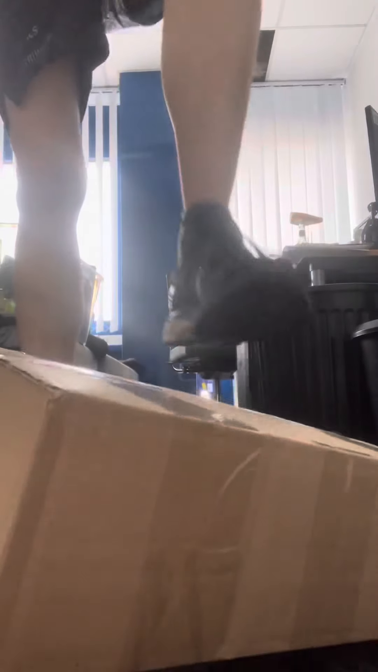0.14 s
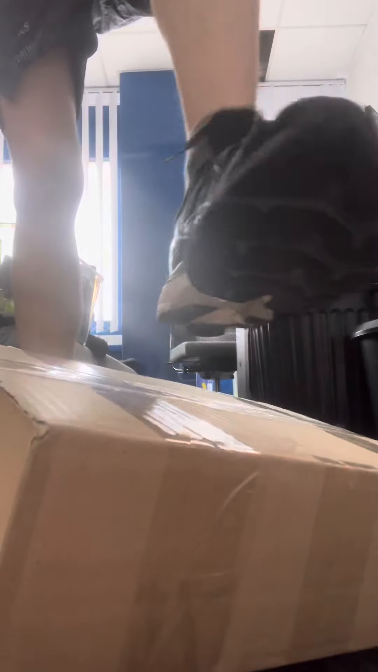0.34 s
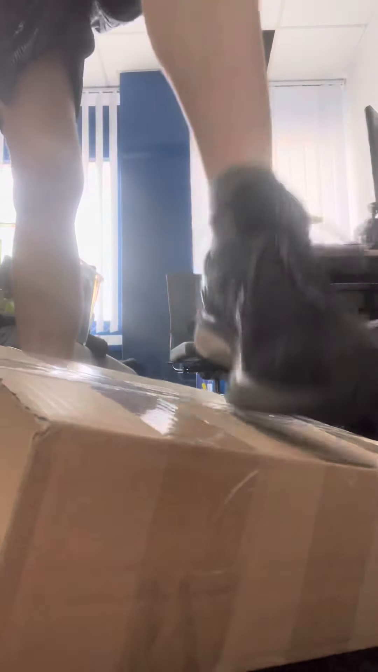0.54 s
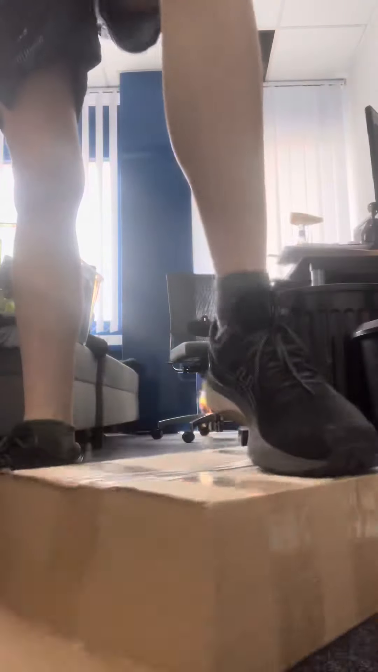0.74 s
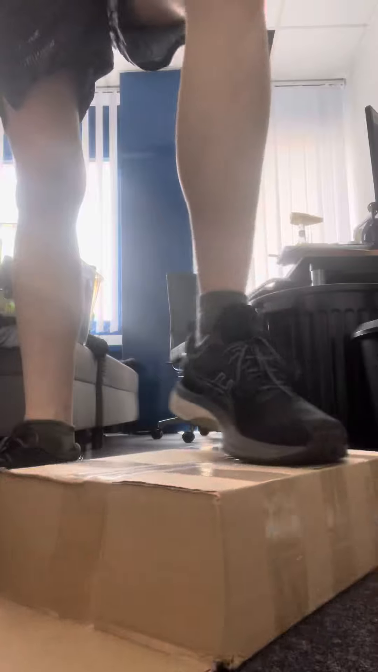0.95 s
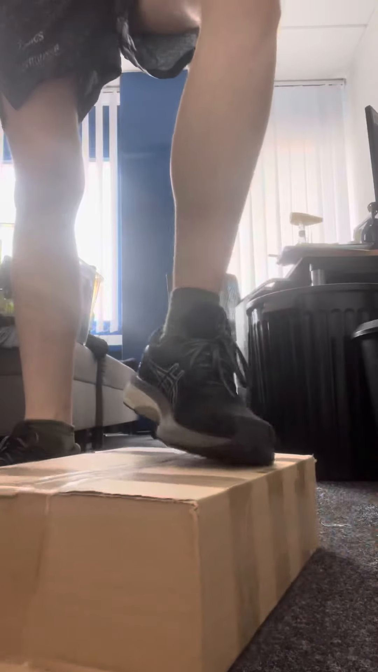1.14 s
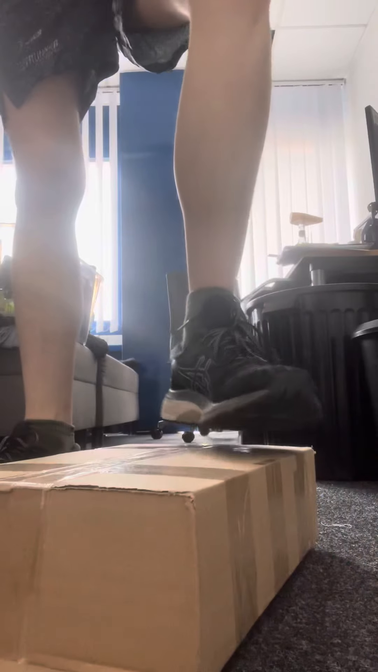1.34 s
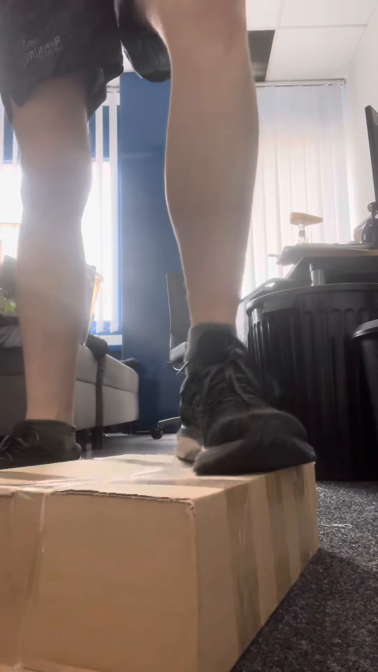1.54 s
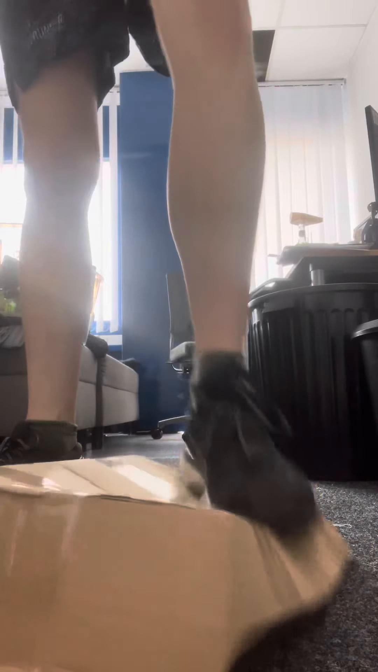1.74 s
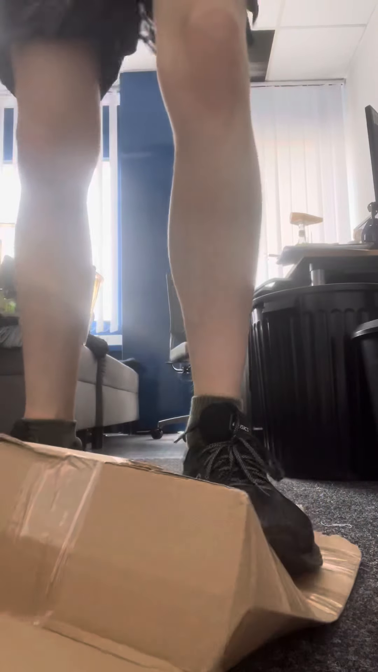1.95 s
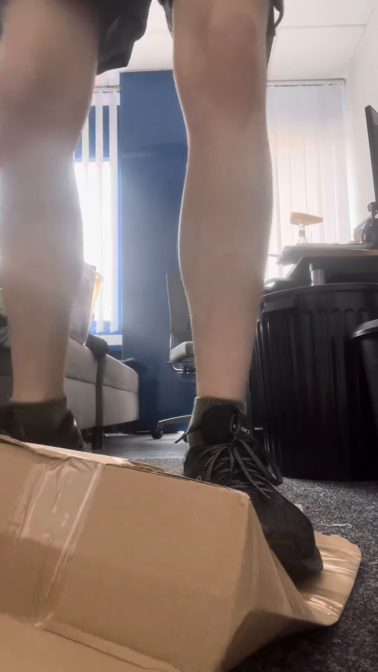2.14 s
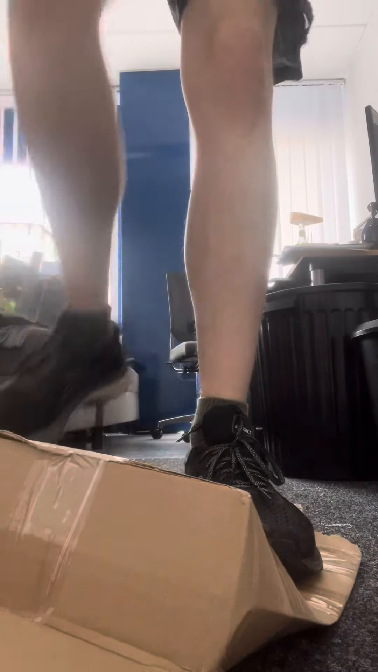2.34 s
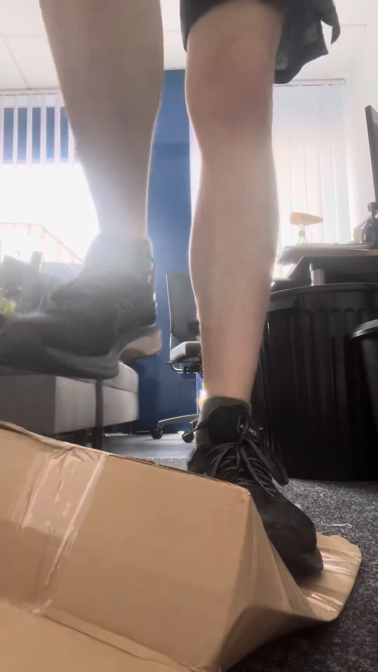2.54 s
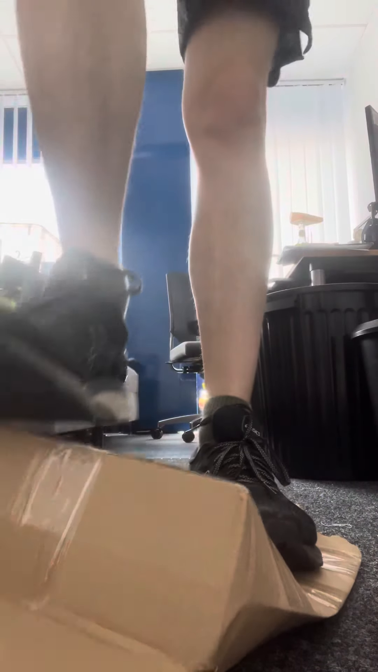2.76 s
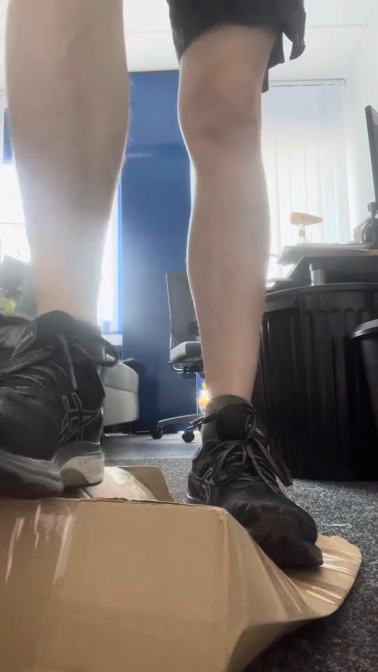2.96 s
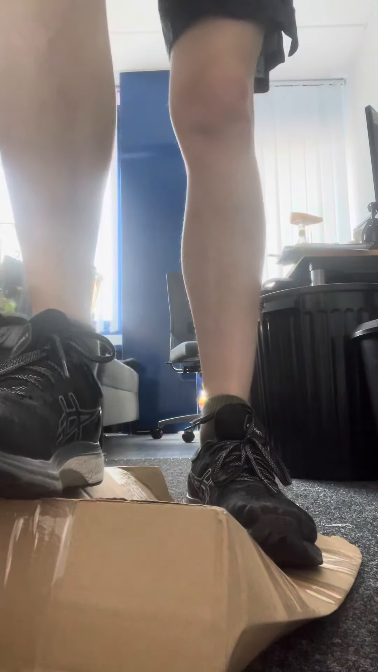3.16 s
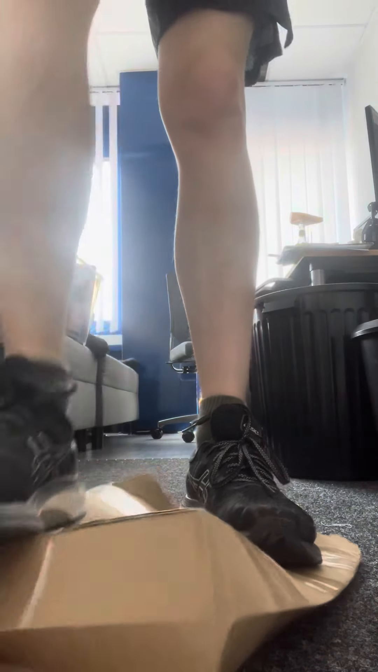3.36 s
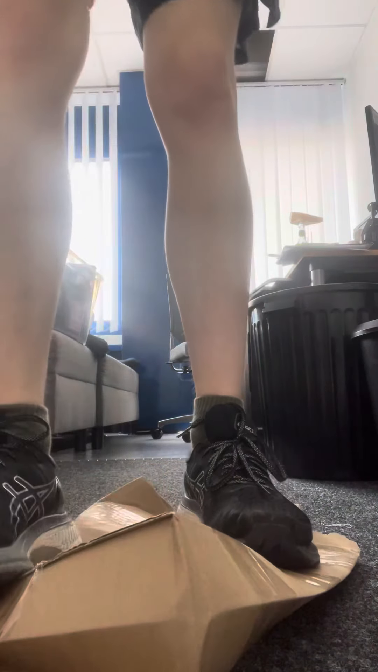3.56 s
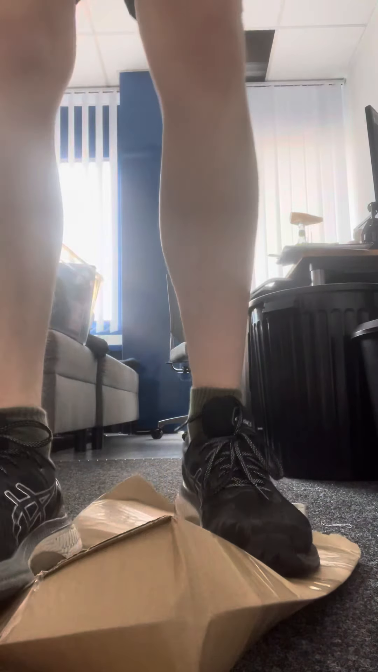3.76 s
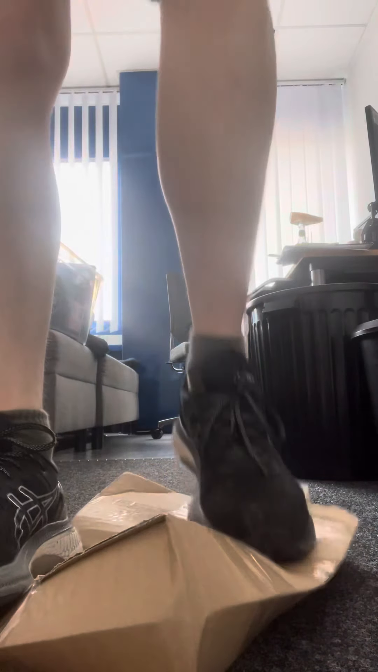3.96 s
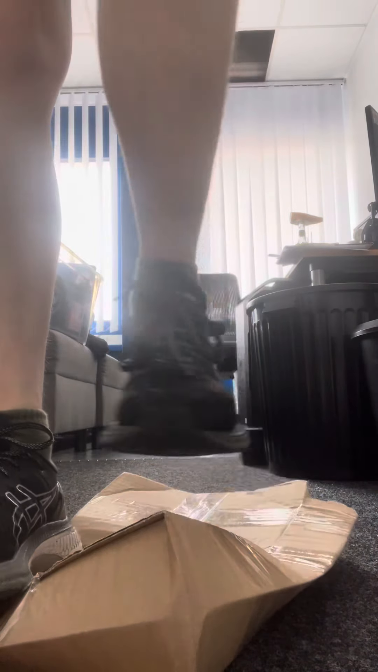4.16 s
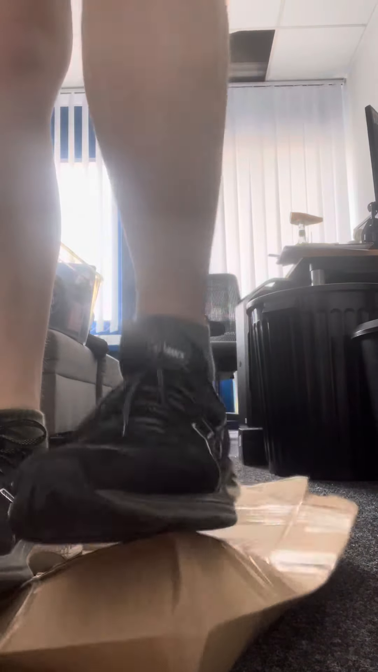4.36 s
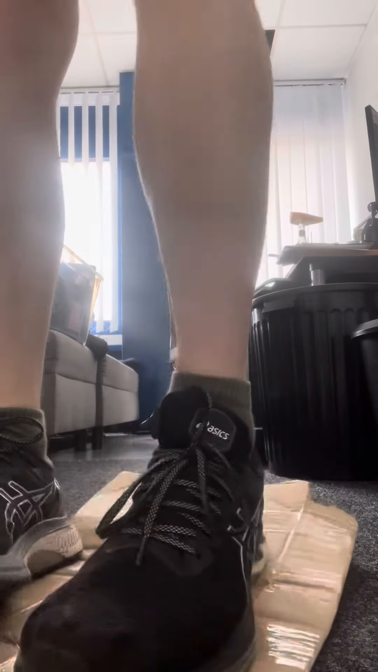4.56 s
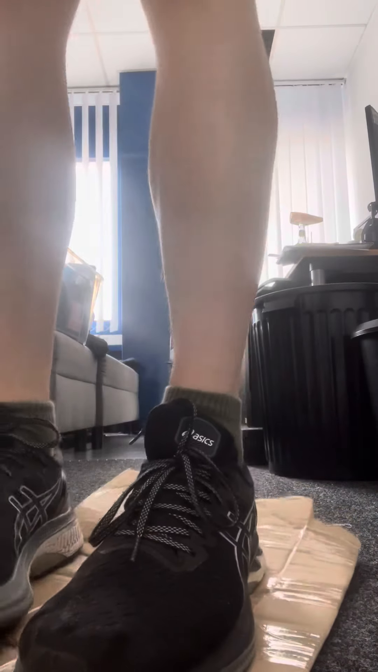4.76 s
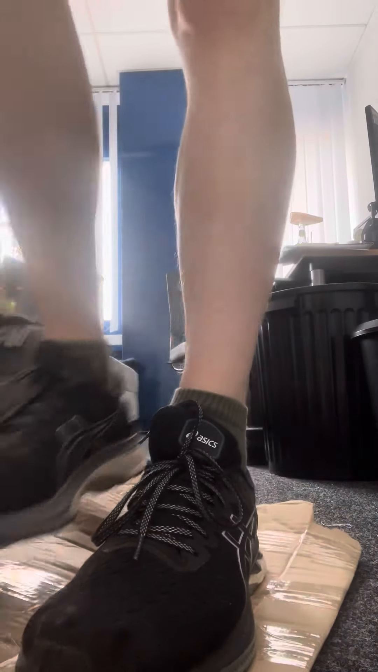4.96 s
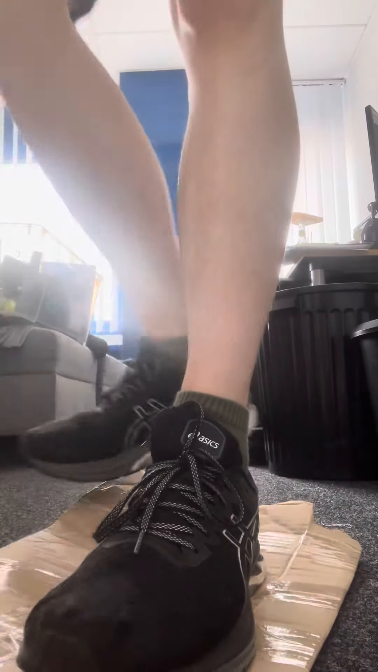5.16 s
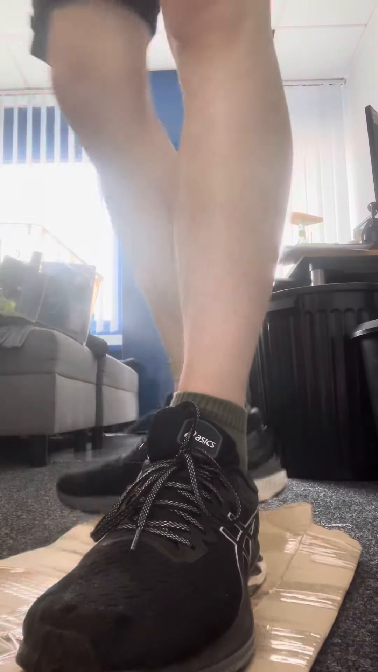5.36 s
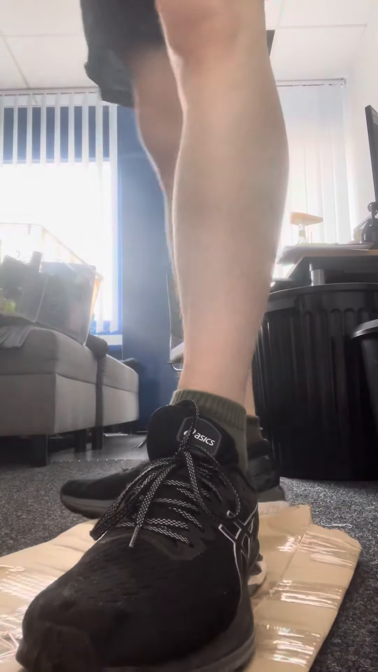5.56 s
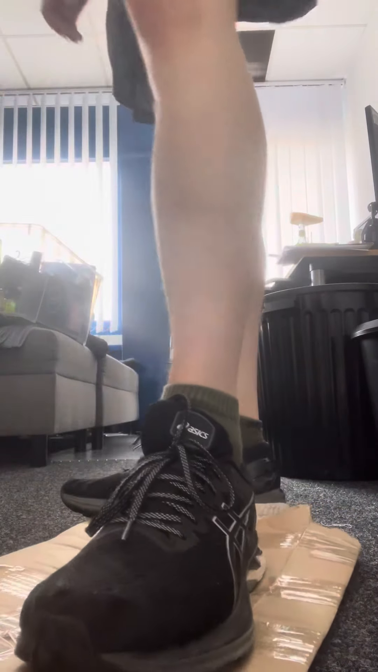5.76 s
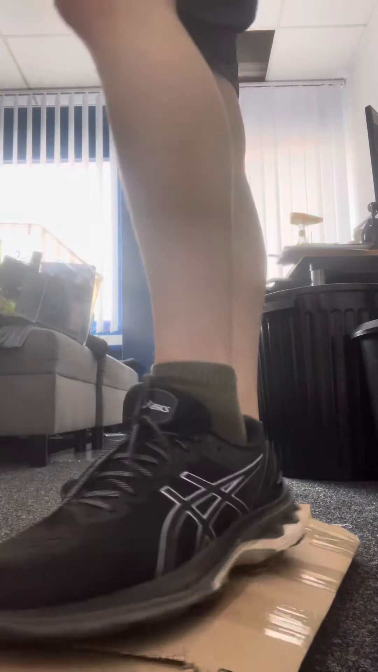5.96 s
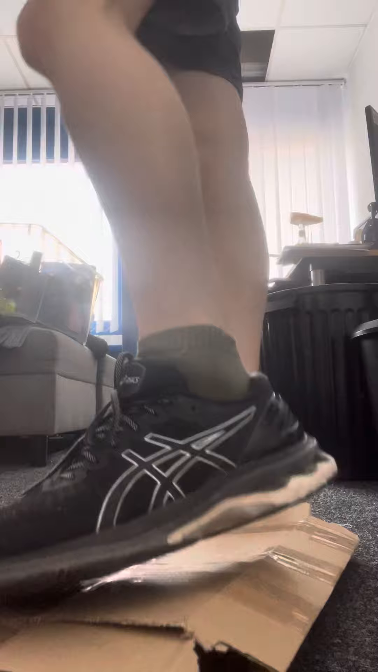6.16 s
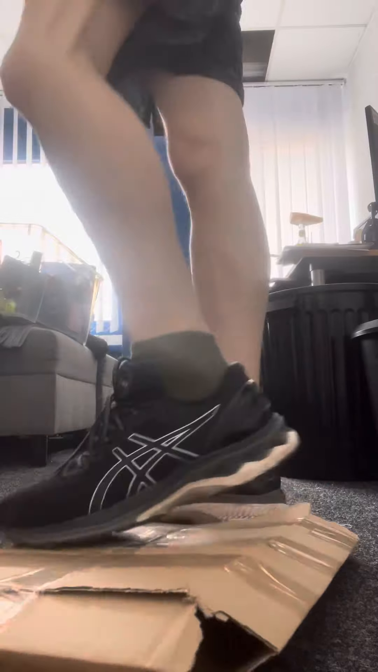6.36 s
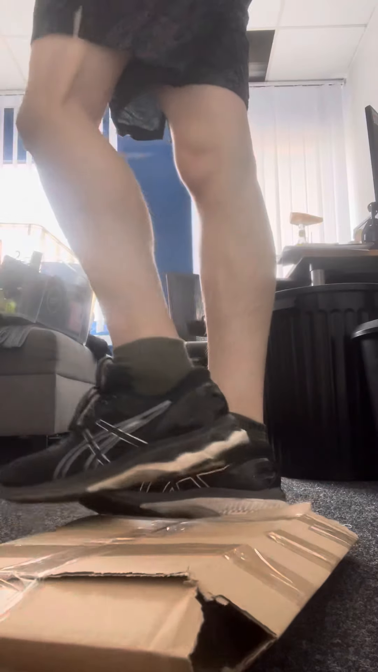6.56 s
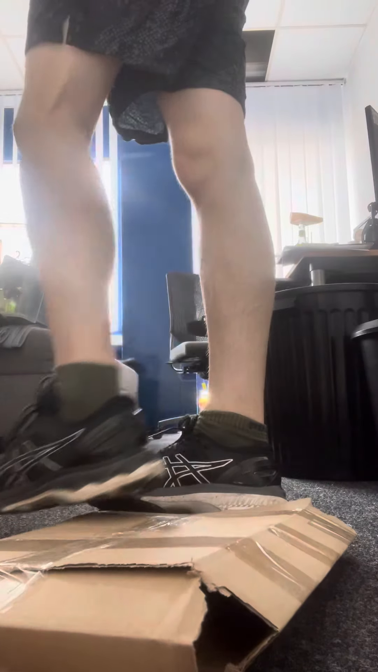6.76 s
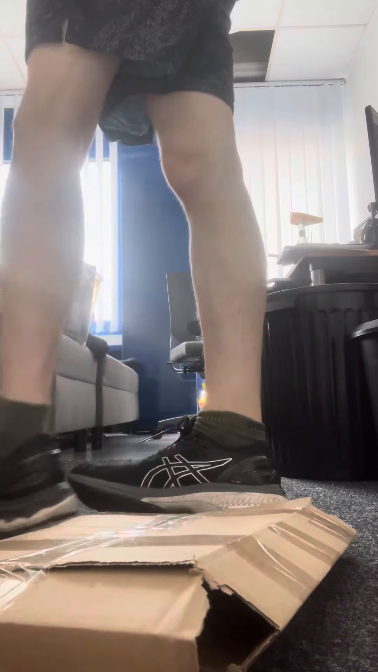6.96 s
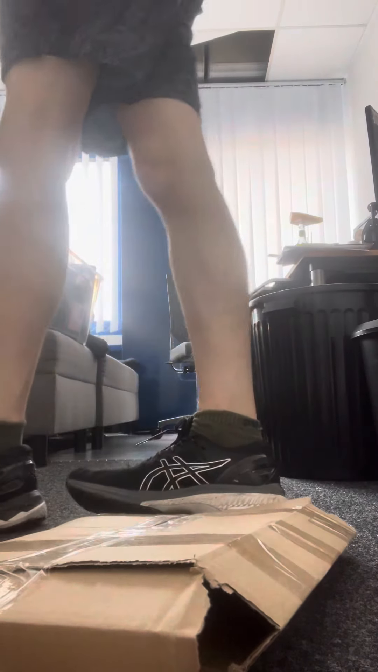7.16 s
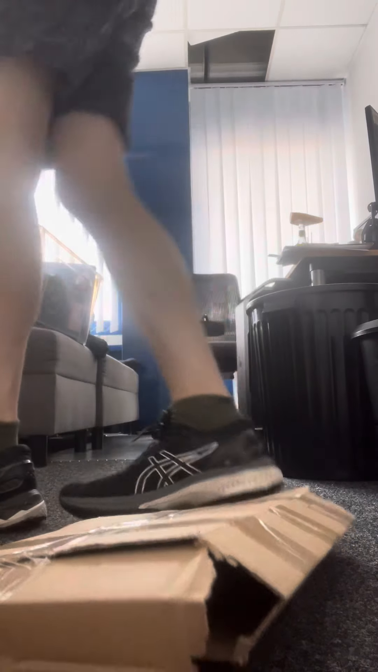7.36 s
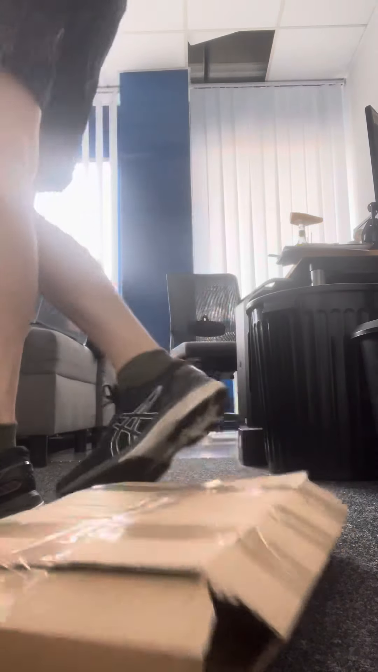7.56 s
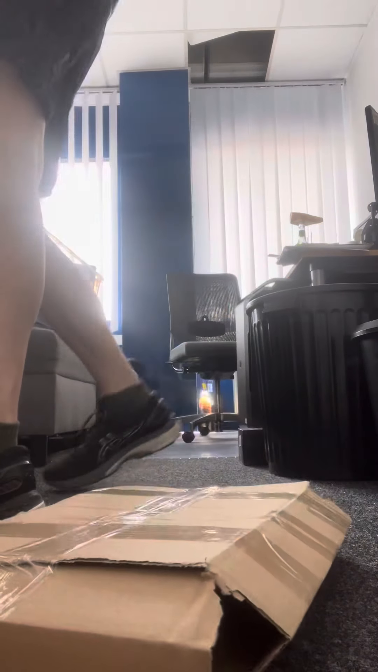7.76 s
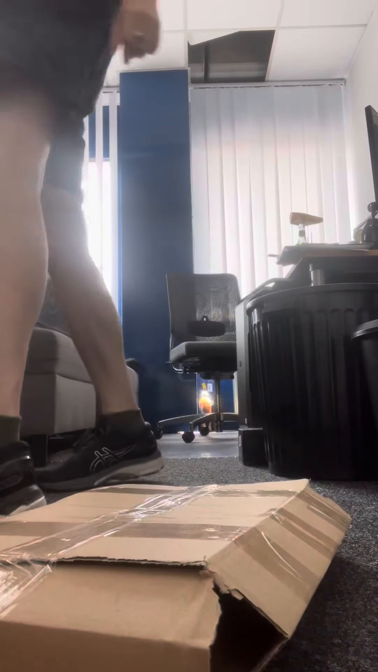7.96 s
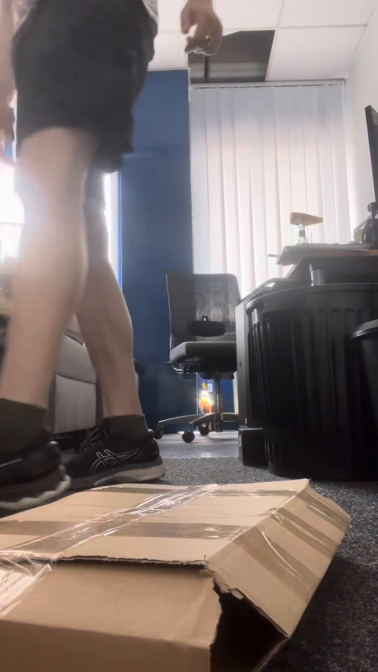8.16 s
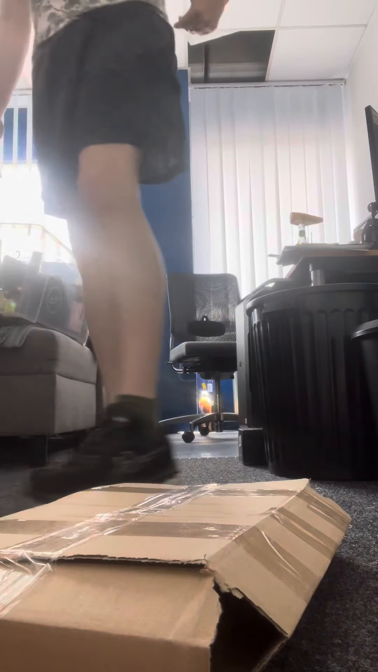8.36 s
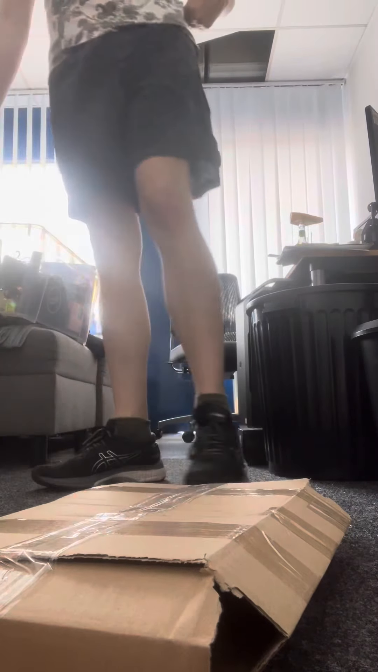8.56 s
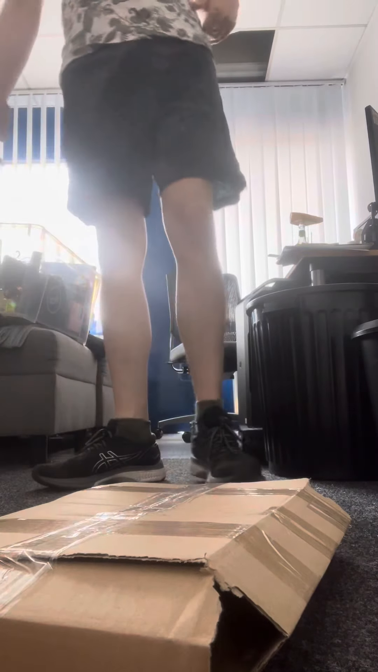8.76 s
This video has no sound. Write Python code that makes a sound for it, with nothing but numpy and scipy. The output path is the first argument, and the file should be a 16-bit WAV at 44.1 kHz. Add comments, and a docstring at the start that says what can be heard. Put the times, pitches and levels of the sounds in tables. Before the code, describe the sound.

A taped cardboard box is crushed underfoot, very close to a microphone on the carpet of a small, damped room with faint air noise. At about 0.6 seconds a shoe lands with a thud, and the board rasps and scrapes until 1.3. From 1.5 to 1.8 the box caves in with thumps and a loud cluster of pops and cracks. After a lull, a scrape swells near 2.8, leading to a second loud, popping crunch around 3.3. A softer rub comes near 3.9 and a sharp crunching stamp at 4.4, followed by single hollow pops at about 4.8 and 5.3. From 6 to 7 seconds tape and fibres tick and crackle more quietly under shifting soles. Light scrapes and a soft bump come around 7.6, then the flattened folds give faint little creaks until nearly 9 seconds.

```python
"""Stamping a cardboard box flat

A shoe crushes a taped box on an office carpet, right in front of a phone on the floor.
The board scrapes and crumples in many tiny slips, its panels buckle with short pops, its walls and
the floor thud, and the tape ticks. Faint air noise, a small damped room and a microphone with two
openings colour the sound."""
import sys
import numpy as np
from scipy import signal
from scipy.fft import rfft, irfft, next_fast_len
from scipy.io import wavfile
from scipy.ndimage import uniform_filter1d

SR = 44100
rng = np.random.default_rng(int(sys.argv[2]) if len(sys.argv) > 2 else 0)


def put_to_file(sound):
    """Save the sound as 16-bit audio at rate SR, in the file named by the first command-line argument."""
    columns = np.atleast_2d(sound).T  # one column per channel
    safe = np.clip(columns, -1, 1)
    whole_steps = np.round(safe * 32767)
    wavfile.write(sys.argv[1], SR, whole_steps.astype(np.int16))


N = 388501

# Tone colours, saying how strong each pitch is next to the others: f/Hz, level/dB
AIR_TONE = [(12, -43), (20, -11.5), (92, 8.5), (153, -16.5), (471, -30), (524, -32.5), (1110, -24),
            (2280, -31.5), (3060, -32.5), (8700, -43), (12000, -50), (15600, -77.5), (22000, -120)]  # office air
RUMBLE_TONE = [(25, -26.5), (40, -6), (70, -1), (100, -8), (130, -13)]  # the floor under the phone
RASP_TONE = [(530, -31.5), (900, -12), (975, -9.5), (1040, -8), (1290, -8), (1360, -6), (1470, -6),
             (1710, -5.5), (2310, -3), (2460, -5.5), (2630, -7.5), (3500, -25), (4550, -41.5), (7700, -120)]  # the flutes, the wavy ribs inside the board
DRUM_TONE = [(59, -28.5), (100, 3.5), (204, 3), (236, 1.5), (281, 1), (377, -7.5), (420, -19.5),
             (550, -35.5), (920, -120)]  # the walls of the box
CREAK_TONE = [(160, -34.5), (280, -10.5), (456, 0), (519, -5), (688, -4.5), (788, -6.5), (1040, -6),
              (1300, -7), (1690, -37), (2860, -120)]  # the folds
FIZZ_TONE = [(1760, -31), (3000, -9.5), (4290, -11), (4760, -10), (6130, -9), (9730, -9), (11400, -11),
             (12000, -14), (12500, -38.5), (16000, -59.5)]  # rubbing paper and tape
SNAP_TONE = [(2800, -7), (4100, -11.5), (5500, -6.5), (10500, -7), (12500, -10.5), (16000, -19)]  # snapping fibres

# Echoes from carpet and furniture: lowest f/Hz, highest f/Hz, time to fade 60 dB/s, level before filter/dB
ECHO_BANDS = [(191, 980, 0.073, -13), (1180, 8900, 0.066, -13.5)]
# The part of the box's sound that differs between left and right: f/Hz, level/dB
STEREO_WIDTH = [(150, -28), (600, -6), (2000, -13), (4500, -7), (10000, -10)]
# How much louder the left microphone opening is than the right: f/Hz, level/dB
LEFT_LOUDER = [(60, -0.5), (110, 0.5), (200, 0), (380, 2.5), (700, 8), (1290, 4), (2380, 0), (4400, 1.5),
               (8120, -0.5), (15000, 1)]
# How far the left opening is ahead of the right (negative means behind): f/Hz, phase/rad
LEFT_AHEAD = [(100, 0), (2500, -.3), (6900, -.2), (8000, -.8), (11400, -2), (12500, -3.1)]

# The box shifts faintly between strokes: t/s, rasp level/dB, drum level/dB
SHIFTS = [(0, -61.5, -54), (.11, -66.5, -59), (.15, -70.5, -69.5), (.55, -82, -74), (1.34, -75, -51.5),
          (1.43, -62.5, -65.5), (1.49, -82, -76.5), (2.21, -65.5, -63.5), (2.29, -66, -68),
          (3.164, -69, -67), (4.035, -70, -63), (4.255, -61, -70), (4.534, -66.5, -54), (4.955, -69, -69),
          (5.2, -61.5, -70.5), (5.4, -51, -51.5), (5.63, -62.5, -67), (5.799, -56, -66), (5.999, -61, -70),
          (6.12, -54, -64.5), (6.8, -66.5, -68), (7.0, -61, -68.5), (7.075, -81, -79), (7.11, -68.5, -68),
          (7.8, -66.5, -68.5), (8.05, -68, -72.5), (8.2, -79, -73.5), (8.81, -80, -72)]
# The sole presses or drags the board:
# start t/s, length/s, swell/dB, then the level/dB that rasp, drum, creak and fizz each end on
SHOE_STROKES = [(0.576, 0.03, 7.5, -26, -23, -22, -42.5), (0.592, 0.11, 5, -18, -21.5, -23, -31),
                (0.717, 0.15, -6, -31, -34, -38.5, -38), (0.887, 0.066, 12, -26, -33, -38.5, -28.5),
                (0.96, 0.21, -1, -29.5, -35, -38, -32.5), (1.091, 0.12, -1.5, -35.5, -32.5, -53, -58),
                (1.21, 0.059, 18, -34, -30.5, -34, -42), (1.505, 0.05, 19.5, -23.5, -17.5, -21.5, -32),
                (1.618, 0.043, 3, -37.5, -35, -45.5, -40), (1.679, 0.021, -5.5, -31, -21.5, -39, -40),
                (1.689, 0.062, 1, -29.5, -32, -22, -37.5), (1.766, 0.015, -0.5, -30.5, -27.5, -37, -42),
                (1.808, 0.062, -4.5, -41.5, -42.5, -42, -49.5), (1.95, 0.0072, 7.5, -46.5, -31.5, -40, -54),
                (2.018, 0.074, 0, -54.5, -54.5, -61, -65), (2.324, 0.34, 7, -51, -58, -56.5, -60),
                (2.75, 0.17, 18.5, -35.5, -34.5, -35, -45), (2.91, 0.0047, 7, -30.5, -39.5, -52, -32.5),
                (2.978, 0.0074, -2.5, -46.5, -49.5, -53, -50),
                (3.037, 0.077, -3.5, -57.5, -61.5, -64, -64.5), (3.206, 0.071, 32, -32.5, -33, -35, -40.5),
                (3.287, 0.048, 11, -22, -33.5, -18, -29.5), (3.357, 0.091, 1.5, -28.5, -37, -31, -35),
                (3.546, 0.34, 3, -52.5, -56.5, -53.5, -59), (3.839, 0.13, 13, -40.5, -53, -45, -49),
                (4.312, 0.02, -1.5, -31, -35, -36, -37.5), (4.368, 0.036, 3.5, -35.5, -41, -40.5, -40.5),
                (4.402, 0.057, -8, -39.5, -41, -41.5, -45.5), (4.652, 0.16, 10.5, -50, -55, -53, -54),
                (4.83, 0.042, -8.5, -52, -46, -44, -57.5), (4.886, 0.0046, 9, -50.5, -43, -49, -46.5),
                (5.245, .07, -3, -54, -56, -51, -63), (5.309, 0.065, 4, -45.5, -46, -40, -53),
                (5.815, 0.15, -11.5, -60, -62, -73.5, -66), (6.133, 0.091, -4.5, -50.5, -61, -62, -56),
                (6.25, 0.055, 3.5, -48, -47, -51.5, -48.5), (6.323, 0.034, 1, -55.5, -48, -50, -50),
                (6.382, 0.1, 1, -49.5, -52.5, -54, -56.5), (6.507, 0.021, 4.5, -51.5, -54, -53, -57),
                (6.583, 0.092, 8, -58, -59.5, -57, -61.5), (6.869, 0.095, -4.5, -55, -56.5, -54.5, -62.5),
                (7.168, 0.054, 11, -44, -68.5, -57, -53), (7.232, 0.091, 2, -45.5, -62.5, -58, -52),
                (7.351, 0.1, -3.5, -55, -63.5, -60.5, -65.5),
                (7.469, 0.077, -7, -51.5, -55.5, -55.5, -64.5), (7.572, 0.04, 3, -42.5, -43.5, -42, -51.5),
                (7.655, 0.068, 5, -54.5, -66, -58, -62.5), (8.07, 0.069, 6.5, -59.5, -79.5, -65.5, -79),
                (8.661, 0.04, 0, -74.5, -71.5, -74, -81.5)]
# Panels ring while the box holds one shape (a row only acts if it ends after it starts):
# start t/s, end t/s, f/Hz, width/Hz, boost/dB
PANEL_RINGS = [(0.67, 1.16, 2310, 340, 5), (0.612, .64, 1020, 100, 14.5), (.603, .636, 1600, 150, 14.5),
               (2.1, 2.699, 725, 100, 11.5), (2.1, 2.699, 1200, 180, 9), (3.605, 6, 520, 110, 5),
               (3.598, 3.9, 750, 64, 8), (6.13, 5.8, 1700, 430, 8.5), (7, 7, 1030, 140, 16),
               (6.405, 7.1, 1560, 120, 6), (6.444, 6.545, 1910, 220, 8), (1.605, 1.66, 3000, 630, 10.5),
               (8.07, 8.167, 950, 650, 5.5)]
# Flattened folds creak as they relax: t/s, level/dB
FOLD_CREAKS = [(7.815, -50), (7.96, -56), (7.978, -47), (8.135, -50), (8.232, -54.5), (8.254, -61),
               (8.299, -54.5), (8.309, -50), (8.364, -53.5), (8.376, -53), (8.484, -52.5), (8.505, -53),
               (8.622, -58), (8.659, -50), (8.68, -56.5), (8.752, -61), (8.765, -56)]
# Tape and paper fibres snap: t/s, treble level/dB, body level/dB
TAPE_TICKS = [(.684, -25, -6), (0.7053, -31, -8), (0.746, -43, -7), (1.2355, -27, -16.5), (1.259, -14, -21),
              (1.317, -35, -34.5), (1.6683, -21.5, -20), (1.724, -15.5, -6), (1.7505, -15, -9),
              (1.8292, -47, -21), (1.4, -58, -42.5), (1.558, -25, -19), (1.681, -35, -24),
              (1.921, -45, -33.5), (1.974, -49, -29), (2.0192, -51, -30), (2.117, -54, -40),
              (2.194, -51.5, -40.5), (2.625, -37, -33), (2.9008, -44, -17), (2.916, -12, -44),
              (2.9846, -25, -29), (3.036, -40, -41), (3.2357, -29.5, -33.5), (3.274, -18, -22),
              (3.324, -13.5, -2), (3.5903, -31, -45), (3.61, -30, -33), (3.7, -35, -43),
              (3.7762, -87, -32.5), (3.912, -27.5, -43), (4.023, -49.5, -38), (4.1934, -28.5, -28.5),
              (4.215, -51.5, -41), (4.251, -42, -42), (4.2776, -42, -45), (4.4, -11, -2), (4.497, -60, -39),
              (4.588, -41.5, -48), (4.6137, -41, -45), (4.6719, -36.5, -40), (4.733, -55, -34),
              (4.751, -48, -31), (4.8688, -25, -24.5), (4.9568, -43, -45), (4.991, -38, -50),
              (5.0696, -38, -32.5), (5.186, -46, -51.5), (5.4158, -34, -34.5), (5.594, -36.5, -46),
              (5.631, -38, -42), (5.7734, -31.5, -33), (6.027, -35.5, -44), (6.081, -34, -31),
              (6.0923, -22.5, -39), (6.1005, -29, -29), (6.111, -44, -40), (6.1333, -20, -29.5),
              (6.139, -24, -36), (6.165, -30, -32), (6.1875, -32, -31.5), (6.225, -28, -28.5),
              (6.257, -37, -36), (6.264, -42, -33), (6.3, -32, -40), (6.348, -40, -37), (6.402, -46, -31.5),
              (6.449, -35, -43), (6.462, -28.5, -39), (6.482, -37, -39), (6.506, -30, -35),
              (6.523, -30, -35), (6.5295, -31, -34), (6.588, -35, -33.5), (6.618, -43, -36),
              (6.6292, -33.5, -32), (6.668, -52, -35), (6.749, -44, -46), (6.765, -34, -41),
              (6.79, -51.5, -43), (6.82, -57, -45), (6.838, -33.5, -27.5), (6.9325, -33.5, -34.5),
              (6.9693, -33, -32.5), (7.2605, -41, -43), (7.457, -39, -37), (7.769, -52.5, -43.5),
              (8.0326, -43, -50), (8.137, -51.5, -56), (8.6585, -41.5, -62.5)]
# The sole lands or a wall caves in: t/s, level/dB, f/Hz, length/s, floor shake level/dB
SHOE_THUDS = [(0.581, -8, 189, 0.0065, -16), (1.125, -12, 151, 0.0064, -40.5),
              (1.142, -11, 142, 0.014, -55), (1.255, -21.5, 206.4, 0.034, -33.5),
              (1.532, -17.5, 126.4, 0.026, -31), (1.561, -11, 215, 0.01, -26), (1.671, -6, 273, 0.011, -27),
              (1.947, -46.5, 216, 0.028, -37), (2.77, -28, 92.5, 0.014, -32.5),
              (2.924, -27, 90.4, 0.014, -42), (3.257, -33.5, 281, 0.027, -37),
              (3.296, -12.5, 270, 0.0088, -23), (3.306, -14, 159, 0.0095, -27.5),
              (3.391, -30.5, 167, 0.027, -28), (4.31, -26.5, 186, 0.024, -61),
              (4.401, -8, 184, 0.0038, -34), (4.462, -38, 163, 0.011, -37), (4.493, -33.5, 120, 0.01, -33),
              (4.666, -40, 219, 0.0095, -54), (4.838, -17, 199, 0.0039, -48),
              (5.236, -23, 174, 0.0063, -33.5), (5.333, -39.5, 244, 0.03, -36),
              (6.373, -33.5, 199, 0.011, -58), (6.88, -41, 221, 0.051, -46), (7.583, -33, 290, 0.014, -39),
              (7.833, -51, 85, 0.065, -57)]
# A panel buckles: t/s, level/dB, f/Hz, length/s, crack level/dB
PANEL_POPS = [(0.576, -21, 287, 0.008, -31), (1.236, -31, 332, 0.024, -20),
              (1.508, -22.5, 305, 0.0066, -33.5), (1.558, -23.5, 292, 0.008, -21),
              (1.6803, -7, 169.5, 0.009, -20.5), (1.7015, -15, 920, 0.009, -29.5),
              (1.7259, -3, 690, 0.0032, -10), (1.729, -20, 685, 0.007, -39.5),
              (1.7363, -8.5, 660, 0.0055, -12.5), (1.7413, -7, 647, 0.0045, -18),
              (1.745, -13.5, 900, 0.0056, -6.5), (1.749, -6, 580, 0.0075, -11.5),
              (1.824, -31, 1066, 0.011, -27), (1.955, -33, 1130, 0.01, -49), (2.757, -34, 450, 0.0073, -32),
              (2.919, -35, 1160, 0.0059, -24.5), (3.256, -35.5, 382, 0.0056, -35),
              (3.2756, -11, 1903, 0.0028, -12), (3.298, -7.5, 390, 0.004, -7.5),
              (3.308, -21.5, 504, 0.004, -21.5), (3.322, -10, 985, 0.0063, -14.5),
              (3.332, -7.5, 1000, 0.004, -18.5), (3.339, -8.5, 837, 0.0033, -13.5),
              (3.343, -15.5, 1300, 0.0072, -18.5), (3.3915, -9, 405.6, 0.0074, -35),
              (3.42, -24.5, 371, 0.019, -16), (3.958, -37, 650, 0.0087, -22.5),
              (4.308, -31.5, 480, 0.0075, -22), (4.399, -6, 453, 0.0072, -13),
              (4.405, -12, 870, 0.0032, -8), (4.713, -42, 413, 0.0066, -41),
              (4.831, -19.5, 475, 0.01, -15.5), (4.832, -16, 1130, 0.0044, -23),
              (5.235, -31, 481, 0.011, -54.5), (5.329, -9.5, 485, 0.006, -34.5),
              (5.335, -25.5, 502, 0.01, -46.5), (5.835, -36, 304, 0.012, -28.5),
              (6.138, -37.5, 1300, 0.0092, -34), (6.873, -34, 336, 0.012, -36),
              (6.884, -33, 316, 0.0076, -29), (6.911, -34.5, 316, 0.0086, -48.5),
              (7.457, -43, 401, 0.011, -35), (7.576, -29.5, 335.5, 0.0049, -25),
              (7.604, -42, 1010, 0.0077, -49)]

ATTACK_DB_PER_S, RELEASE_DB_PER_S = 5000, [520, 370, 527, 550]  # release: rasp, drum, creak, fizz
SPRING_BACK_DB, SPRING_FADE_DB_PER_S = -18.5, 143.5
AIR_DB, TREBLE_LIMIT_HZ = -69, 16400


def gain_of(db):
    """Turns decibels into a number to multiply a sound by."""
    return 10 ** (np.asarray(db) / 20)


def evened(x):
    """Scales a signal so that its average power is 1."""
    return x / np.sqrt(np.mean(x ** 2) + 1e-20)


def read(points, hz):
    """Looks up a table between its rows, with every octave equally wide."""
    f, value = np.transpose(points)
    return np.interp(np.log(hz + 1), np.log(f + 1), value)


def add(mix, s, sound):
    """Mixes a sound in at s seconds."""
    part = mix[round(s * SR):][:len(sound)]
    part += sound[:len(part)]


def response(tone, size=8192):
    """Builds a filter: how a thing with this tone colour answers one tap, scaled to energy 1."""
    hz = abs(np.fft.fftfreq(size, 1 / SR))
    octaves_outside = np.log2((hz + 1) / (np.clip(hz, tone[0][0], tone[-1][0]) + 1))
    log_gain = np.log(gain_of(np.maximum(read(tone, hz) - 40 * abs(octaves_outside), -100)))
    spectrum = np.exp(np.conj(signal.hilbert(log_gain)))  # this phase puts all sound after the tap
    taps = np.fft.ifft(spectrum).real[:size // 2]
    return taps / np.linalg.norm(taps)


def flutter(hz):
    """A random wobble, mostly slower than hz."""
    return evened(signal.lfilter([1], [1, -np.exp(-2 * np.pi * hz / SR)], rng.standard_normal(N)))


def blur(patches, frames):
    """Smooths a grid of values over nearby pitches and moments."""
    return uniform_filter1d(uniform_filter1d(patches, size=3, axis=0), size=frames, axis=1)


def favour(noise, span_hz, pick, sharpness):
    """Makes one pitch stand out of a noise; pick, from 0 to 1, places it within the span."""
    hz = span_hz[0] * (span_hz[1] / span_hz[0]) ** pick
    return noise + .8 * evened(signal.lfilter(*signal.iirpeak(hz, sharpness, SR), noise))


def burst(tone, fade_s, noise):
    """A puff of noise that fades 60 dB in fade_s, is given a tone colour and peaks at 1."""
    puff = noise * gain_of(-60 * np.arange(len(noise)) / SR / fade_s)
    out = signal.fftconvolve(puff, response(tone)[:1024])
    return out / abs(out).max()


def ring(hz, length_s, glide, rise_cycles):
    """A bending panel rings until the sole chokes it; fast waves arrive first, so the pitch drops."""
    t = np.arange(int(.2 * SR)) / SR
    cycles = np.cumsum(hz * (1 + glide * np.exp(-t * hz * 1.87))) / SR
    loudness = (1 - np.exp(-t * hz / rise_cycles)) * np.exp(-(t / max(length_s, .002)) ** 3)
    return np.sin(2 * np.pi * cycles) * loudness / loudness.max()


def office_air():
    """Faint wavering air noise, nearly alike on both sides."""
    shared, left, right = rng.standard_normal((3, N))
    noise = shared + 0.22 * np.array([left, right])
    air = signal.oaconvolve(noise, response(AIR_TONE)[None], axes=1)[:, :N]
    return gain_of(AIR_DB + 2.5 * flutter(3)) * evened(air)


def room_echoes(x):
    """Carpet and furniture send back tiny echoes, different on each side; the treble dies sooner."""
    size = SR // 10
    taps = np.zeros((2, size))
    slots = np.arange(30, size - 10, 10)  # one echo in every 10 samples
    arrivals = slots + rng.integers(0, 10, (2, len(slots)))
    np.put_along_axis(taps, arrivals, rng.choice([-1., 1.], arrivals.shape), 1)
    tail = 0
    for low_hz, high_hz, fade_s, db in ECHO_BANDS:
        dying = taps * gain_of(-60 * np.arange(size) / SR / fade_s)
        dying = dying / np.linalg.norm(dying, axis=1, keepdims=True)
        band = signal.butter(2, [low_hz, high_hz], "band", fs=SR, output="sos")
        tail = tail + gain_of(db) * signal.sosfilt(band, dying)
    return signal.fftconvolve(x[None], tail, axes=1)[:, :N]


def moving_spots(x):
    """Sound leaves from ever new spots on the box, so left and right differ in shifting patches."""
    hz, t, spectrum = signal.stft(x, SR, nperseg=256, noverlap=192)
    real, imaginary = rng.standard_normal((len(t), len(hz), 2)).T
    place = blur(real + 1j * imaginary, frames=10)
    place = place / np.sqrt(np.mean(abs(place) ** 2))
    width = gain_of(read(STEREO_WIDTH, hz))[:, None]
    side = signal.istft(spectrum * place * width, SR, nperseg=256, noverlap=192)[1][:N]
    return np.array([x + side, x - side])


def settling_folds():
    """Flattened folds relax with small creaks, each starting with a crisp tick."""
    out, count = np.zeros(N), len(FOLD_CREAKS)
    for (s, db), noise, pick in zip(FOLD_CREAKS, rng.standard_normal((count, 6000)), rng.random(count)):
        creak = favour(noise, span_hz=(1150, 1900), pick=pick, sharpness=2.8)
        add(out, s, gain_of(db) * burst(RASP_TONE, 0.041, creak))
        add(out, s, gain_of(db - 6.5) * burst(SNAP_TONE, 0.01, noise[::-1]))
    return out


def tape_ticks():
    """Tape and paper fibres snap brightly, and the hollow flutes sound on for a moment."""
    out, count = np.zeros(N), len(TAPE_TICKS)
    noises, picks = rng.standard_normal((count, 2, 2000)), rng.random((count, 2))
    for (s, treble_db, body_db), noise, pick in zip(TAPE_TICKS, noises, picks):
        bright = favour(noise[0], span_hz=(5500, 10000), pick=pick[0], sharpness=1.9)
        hollow = favour(noise[1], span_hz=(1600, 2400), pick=pick[1], sharpness=8.6)
        tail = gain_of(-14) * burst(RASP_TONE, 0.04, hollow[::-1])
        add(out, s, gain_of(treble_db) * burst(SNAP_TONE, 0.0074, bright))
        add(out, s, gain_of(body_db) * (burst(RASP_TONE, 0.008, hollow) + tail))
    return out


def thuds():
    """The sole lands or a wall caves in with a low thud, and the floor shakes at about 70 Hz."""
    out = np.zeros(N)
    for s, db, hz, length_s, shake_db in SHOE_THUDS:
        add(out, s, gain_of(db) * ring(hz, length_s, glide=0.48, rise_cycles=0.23))
        add(out, s, gain_of(shake_db) * ring(70, 0.03, glide=0.23, rise_cycles=0.53))
    return out


def buckling_pops():
    """A panel gives way with a short falling note, a higher overtone and a noisy crack."""
    out = np.zeros(N)
    noises = rng.standard_normal((len(PANEL_POPS), 1500))
    for (s, db, hz, length_s, crack_db), noise in zip(PANEL_POPS, noises):
        glide = 2.4 * np.clip(1.5 + (crack_db - db) / 24, 0, 1)  # a weak crack means less pitch drop
        note = ring(hz, length_s, glide, rise_cycles=0.62)
        overtone = ring(2.423 * hz, .5 * length_s, glide=1.05, rise_cycles=0.24)
        add(out, s, gain_of(db) * (note + .5 * overtone))
        add(out, s, gain_of(crack_db) * burst(RASP_TONE, 1.6 * length_s, noise))
    return out


def ringing_panels(x):
    """Panels boost their own pitches; other small peaks come and go as the board bends."""
    hz, t, spectrum = signal.stft(x, SR, nperseg=512, noverlap=384)
    patches = rng.standard_normal((len(t), len(hz))).T
    boost_db = 2.6 * evened(blur(patches, frames=14))
    for start, end, ring_hz, width_hz, db in PANEL_RINGS:
        peak = 1 / (1 + (2 * (hz - ring_hz) / width_hz) ** 2)
        boost_db = boost_db + db * np.outer(peak, (t > start) & (t < end))
    return signal.istft(spectrum * gain_of(boost_db), SR, nperseg=512, noverlap=384)[1][:, :N]


def shoe_motion():
    """Rasp, drum, creak and fizz in dB: the sole presses and lets go, and the board springs back."""
    t = np.arange(0, N / SR + .004, .001)
    s, rasp_db, drum_db = np.transpose(SHIFTS)
    rasp_db, drum_db = np.interp(t, s, rasp_db), np.interp(t, s, drum_db)
    power = gain_of([rasp_db, drum_db, rasp_db - 7, rasp_db - 7]) ** 2  # faint shifting between strokes
    for start, length_s, swell_db, *end_db in SHOE_STROKES:
        since_start, since_end = t - start, np.maximum(t - start - length_s, 0)
        attack_db = ATTACK_DB_PER_S * np.minimum(since_start, 0)
        press_db = attack_db + swell_db * (np.clip(since_start / length_s, 0, 1) - 1)
        release = gain_of(-np.outer(RELEASE_DB_PER_S, since_end)) ** 2
        spring_back = gain_of(SPRING_BACK_DB - SPRING_FADE_DB_PER_S * since_end) ** 2
        power = power + gain_of(np.add.outer(end_db, press_db)) ** 2 * (release + spring_back)
    return [np.interp(np.arange(N) / SR, t, 10 * np.log10(layer)) for layer in power]


def grains(per_s, spread_db, rub):
    """Tiny slips of uneven size over a smooth rubbing noise."""
    sizes = gain_of(spread_db * np.minimum(rng.exponential(1, N), 4)) * rng.choice([-1, 1], N)
    slips = sizes * (rng.random(N) < per_s / SR)
    return evened(evened(slips) + rub * rng.standard_normal(N))


def crumpling_board():
    """One jerky motion of the board drives five layers of noise, from floor rumble to paper fizz."""
    rasp_db, drum_db, creak_db, fizz_db = shoe_motion()
    jerks = flutter(22)
    slips = grains(1500, spread_db=3.5, rub=1.4)
    # light pressure lets single fibres crackle; a hard slide merges them into a rush
    lightness = np.clip((-33.5 - rasp_db) / 14, 0, 1)
    crackle = lightness * grains(100, spread_db=5.0, rub=0)
    folds = grains(400, spread_db=2.0, rub=0.86) + 0.043 * crackle
    flutes, folds = ringing_panels(np.array([slips + 0.074 * crackle, folds]))
    layers = [  # tone colour, level/dB, the noise that drives it
        (RASP_TONE, rasp_db + jerks + 0.23 * flutter(60), flutes),
        (DRUM_TONE, drum_db + 0.27 * jerks + 0.65 * flutter(6.5), grains(150, spread_db=8.0, rub=1.7)),
        (RUMBLE_TONE, 0.69 * drum_db - 18.0 + 2.4 * flutter(5.2), rng.standard_normal(N)),
        (CREAK_TONE, creak_db + 1.9 * jerks + 0.22 * flutter(30), folds),
        (FIZZ_TONE, fizz_db + 2.27 * jerks + 0.24 * flutter(70),
         evened(.6 * slips + grains(600, spread_db=4, rub=1.8)) + .4 * crackle)]
    return sum(signal.oaconvolve(gain_of(db) * noise, response(tone))[:N] for tone, db, noise in layers)


def scene():
    """The box, its echoes and the office air."""
    box = crumpling_board() + buckling_pops() + thuds() + tape_ticks() + settling_folds()
    return moving_spots(box) + room_echoes(box) + office_air()


def record(dry):
    """Each microphone opening has its own level and phase; peaks round off and the top treble is cut."""
    size = next_fast_len(N + 4096)
    hz = np.fft.rfftfreq(size, 1 / SR)
    left = gain_of(read(LEFT_LOUDER, hz) / 2) * np.exp(.5j * read(LEFT_AHEAD, hz))
    openings = irfft(rfft(dry, size) * np.array([left, 1 / left]), size)[:, :N]
    rounded = 1.3 * np.tanh(openings / 1.3)
    treble_cut = signal.firwin(511, TREBLE_LIMIT_HZ, window=("kaiser", 9), fs=SR)
    return signal.oaconvolve(rounded, treble_cut[None], "same")


dry = scene()
out = record(dry)
put_to_file(out)
```